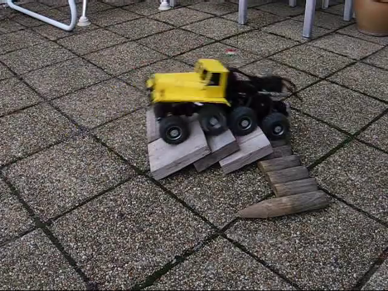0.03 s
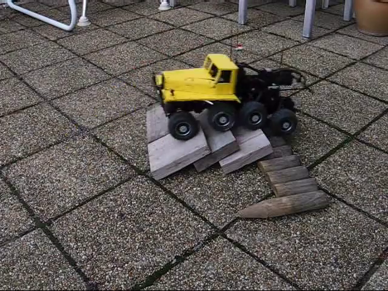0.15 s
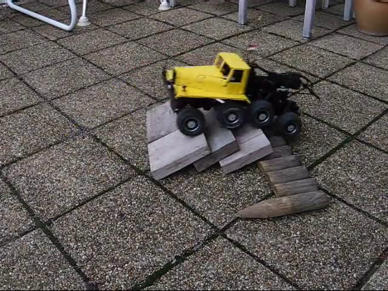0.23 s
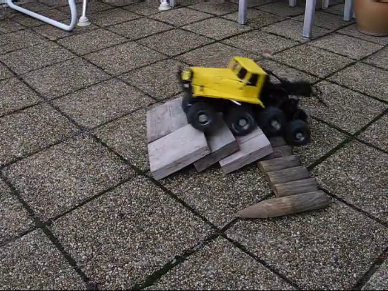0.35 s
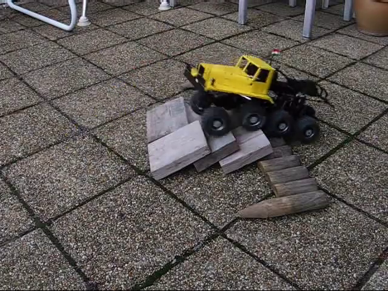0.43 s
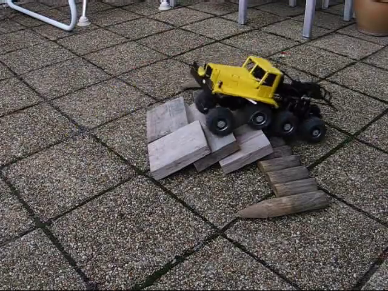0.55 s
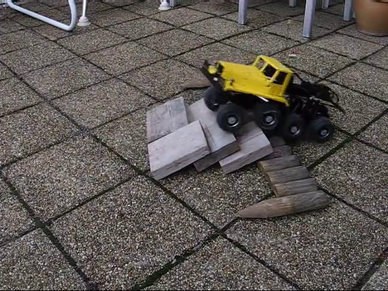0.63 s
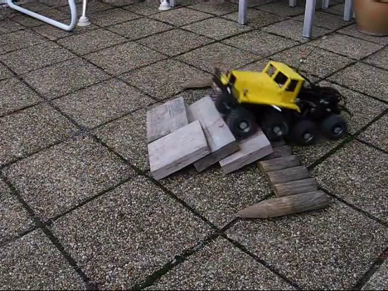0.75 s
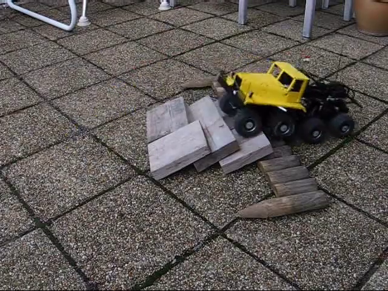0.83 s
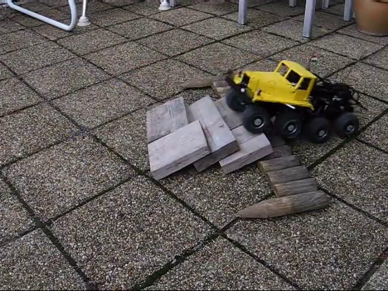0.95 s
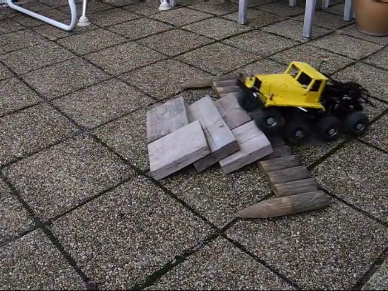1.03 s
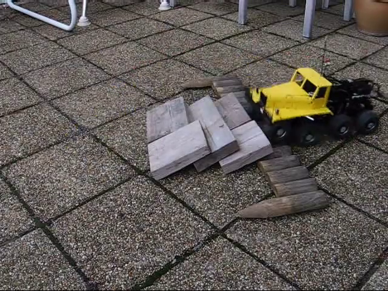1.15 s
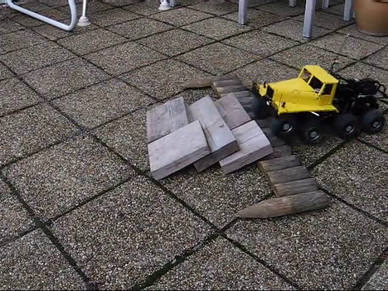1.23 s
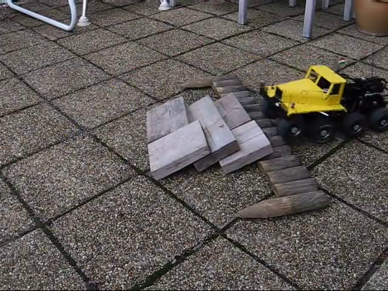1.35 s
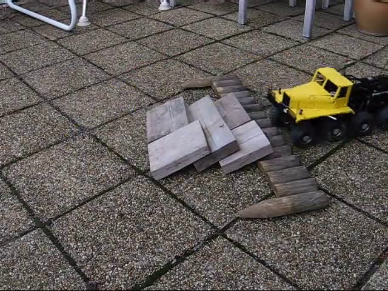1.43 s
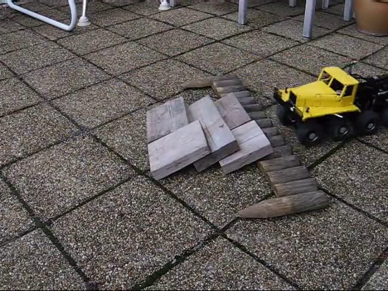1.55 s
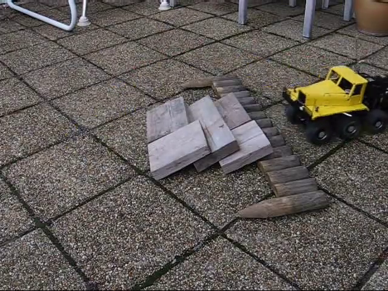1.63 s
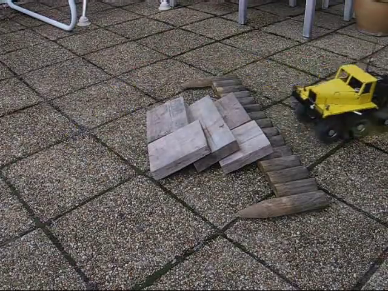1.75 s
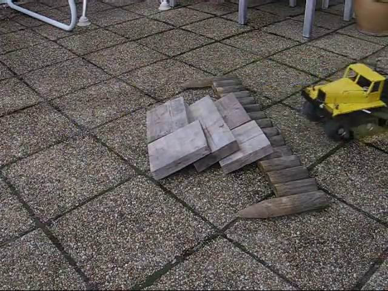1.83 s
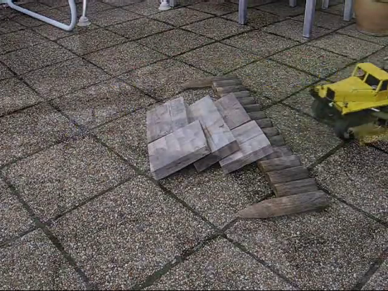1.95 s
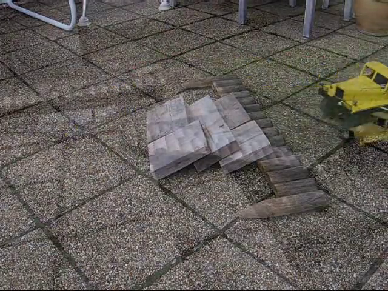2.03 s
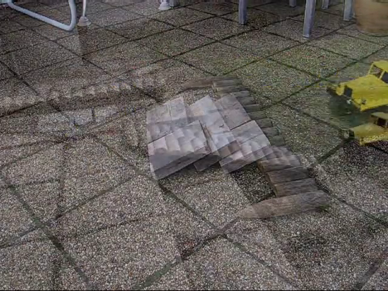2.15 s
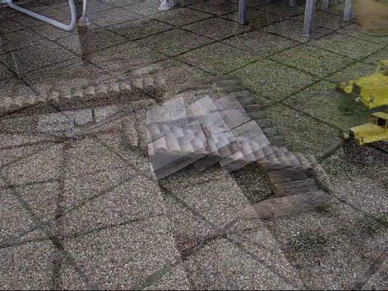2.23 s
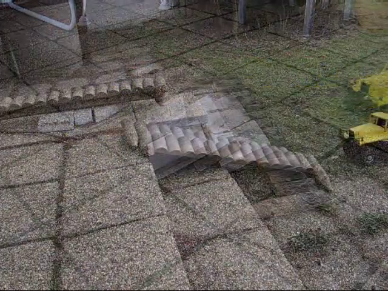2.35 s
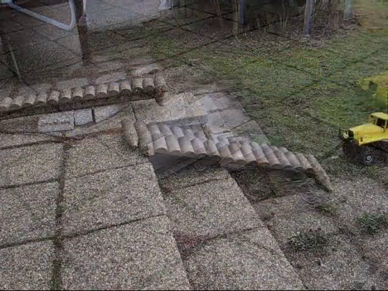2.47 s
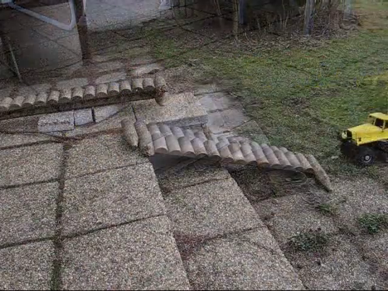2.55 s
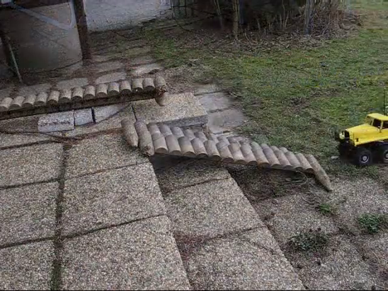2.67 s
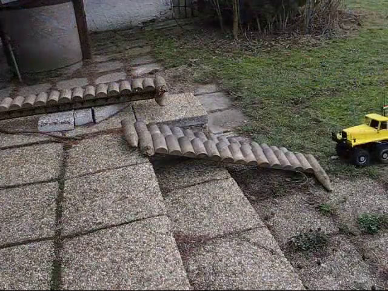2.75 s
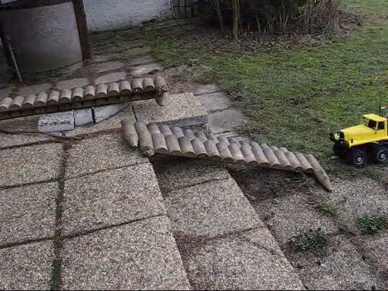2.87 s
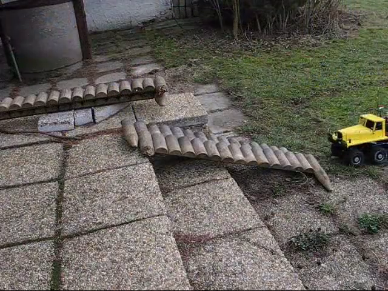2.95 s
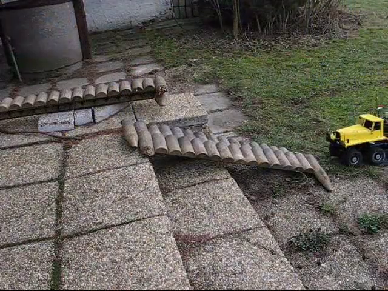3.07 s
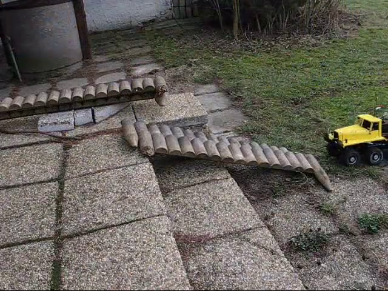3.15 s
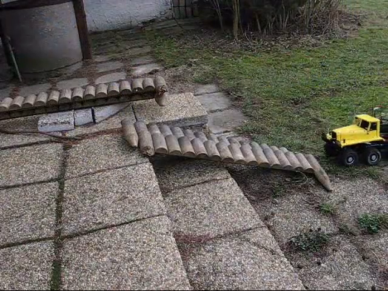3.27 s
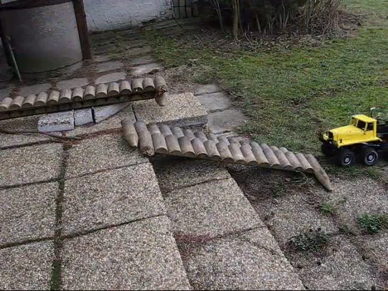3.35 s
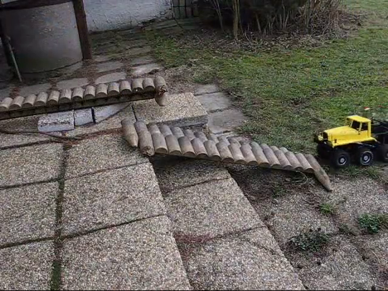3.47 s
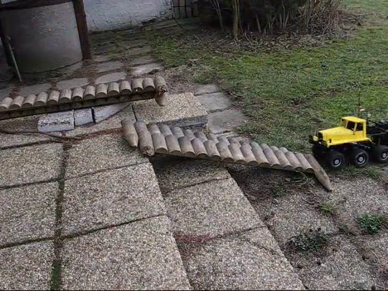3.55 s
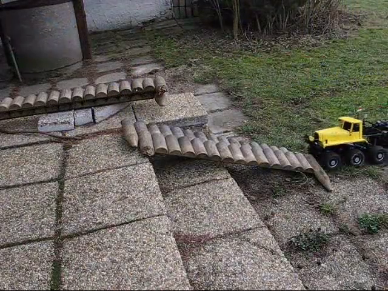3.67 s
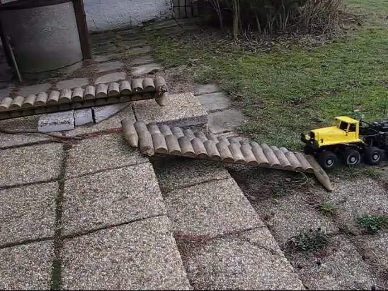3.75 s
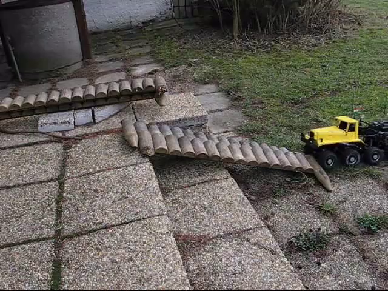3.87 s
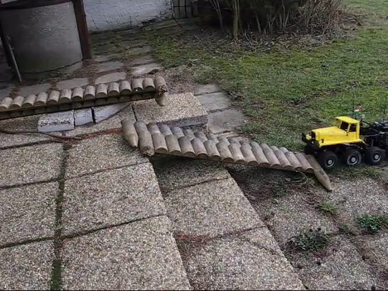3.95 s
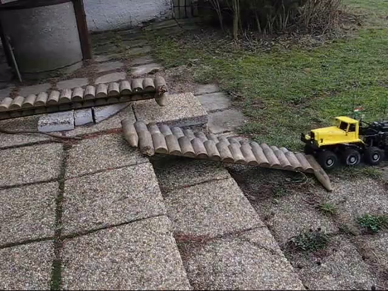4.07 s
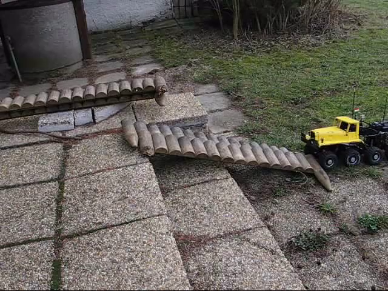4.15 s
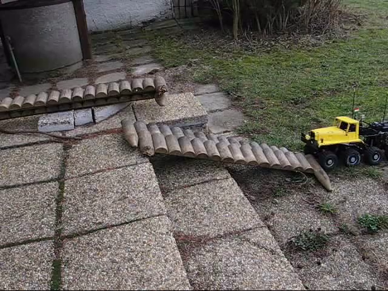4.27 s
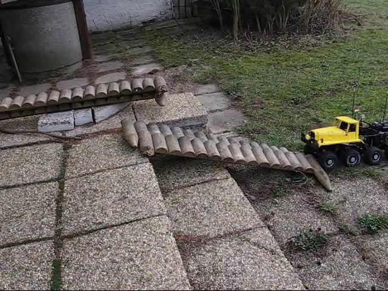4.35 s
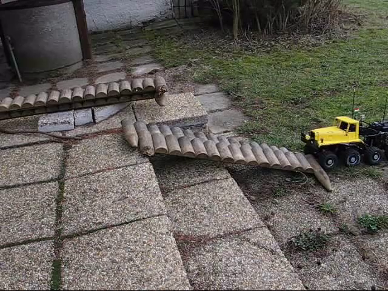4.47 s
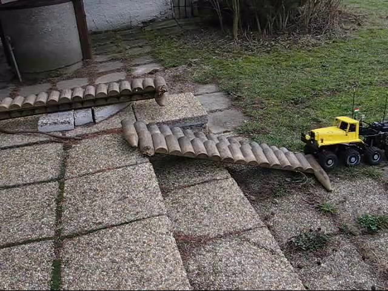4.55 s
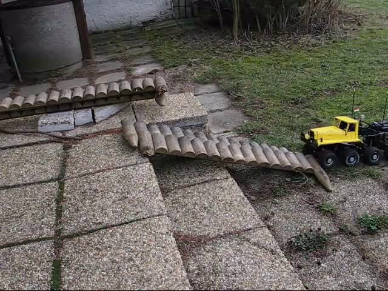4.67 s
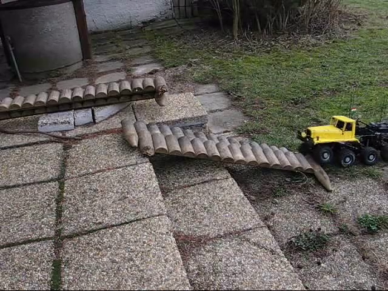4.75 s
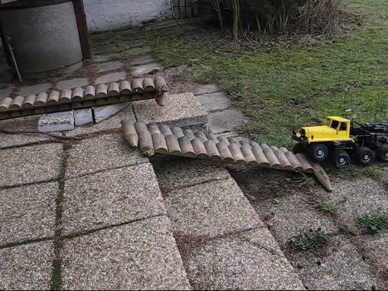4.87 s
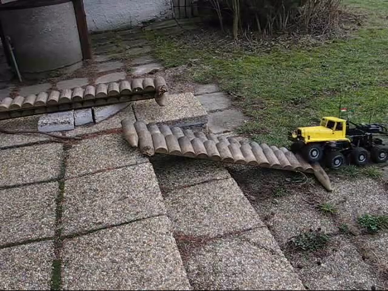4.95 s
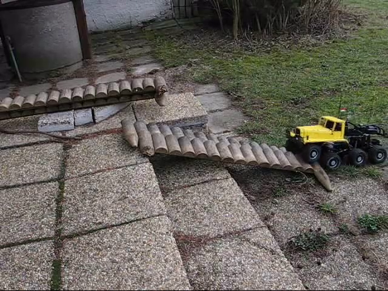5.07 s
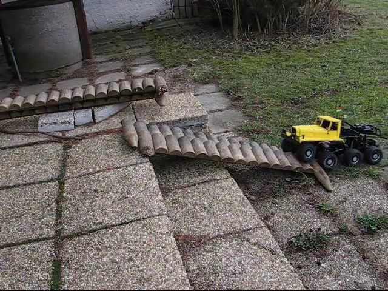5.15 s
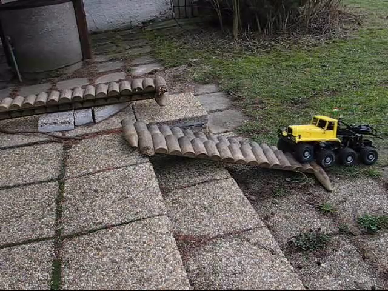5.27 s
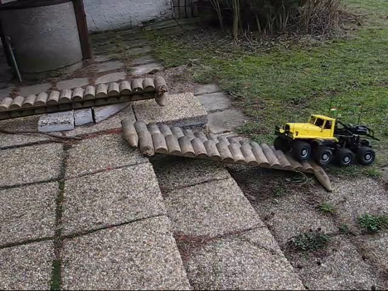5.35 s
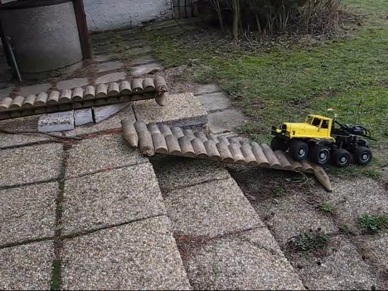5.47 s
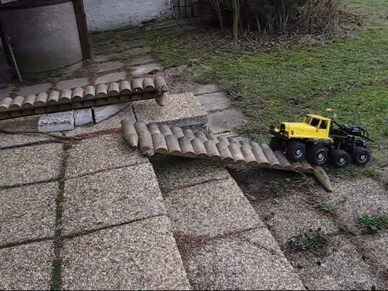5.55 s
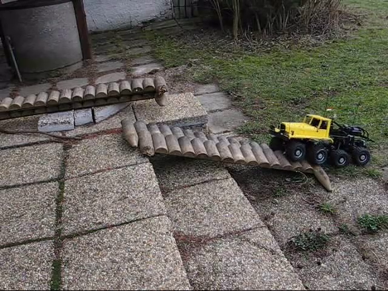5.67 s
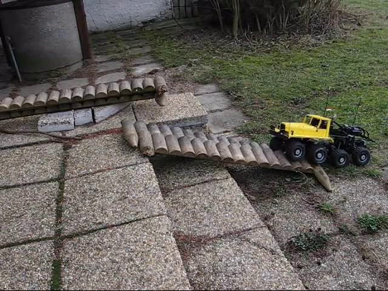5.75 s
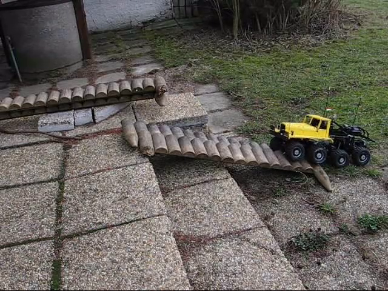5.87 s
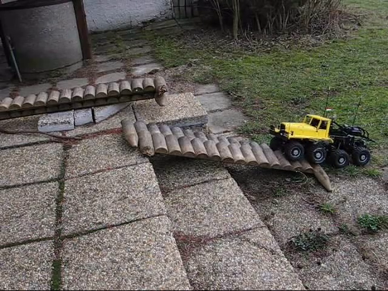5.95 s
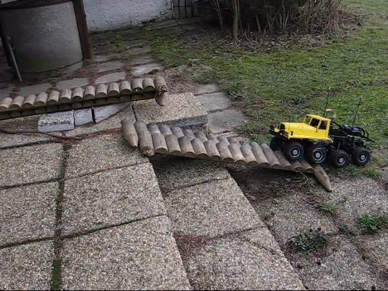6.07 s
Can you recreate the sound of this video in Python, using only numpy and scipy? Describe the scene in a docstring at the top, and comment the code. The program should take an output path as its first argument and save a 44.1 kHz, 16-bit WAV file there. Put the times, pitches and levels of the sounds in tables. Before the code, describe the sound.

Close, dense plastic gear rattle from a small motorized toy truck, with gliding high whines and hollow wheel knocks on wood. The drive softens, picks up, then stops for under a second, leaving faint hiss, short motor twitches and a hard clack. It restarts abruptly and weakens near the end. Low wind gusts bump the single microphone on a terrace; the sound is gritty, with crude metallic treble.

```python
"""Plastic gears rattle densely first: on a terrace, a toy truck with small electric motors crawls over wooden blocks.
It stops, twitches and starts again: random tooth contacts ring the shell, sines glide as gear whines,
struck resonances make the wheel knocks and drive clacks, and low noise in gusts is wind at the one microphone.
Wandering tones lie under the rattle, outdoor hiss and faint steady tones behind;
a pocket camera holds each slow sample, mirroring the sound into the treble."""
import sys
import numpy as np
from scipy import signal
from scipy.fft import rfft, irfft, next_fast_len
from scipy.io import wavfile

SR = 44100
rng = np.random.default_rng(int(sys.argv[2]) if len(sys.argv) > 2 else 0)


def master(y):
    """Save y as 16-bit WAV."""
    cut = np.clip(np.atleast_2d(y).T, -1, 1)
    pcm = np.round(cut * 32767)  # scale
    wavfile.write(sys.argv[1], SR, pcm.astype(np.int16))


N = 269451  # length [samples]
HOLD = 4  # samples for which the camera holds each value


def amp(db):
    """Turn dB into gain."""
    return 10 ** (np.asarray(db) / 20)


def rms_one(x):
    """Scale to rms 1."""
    return x / np.sqrt(np.mean(x ** 2) + 1e-20)


def in_time(rows):
    """Interpolate the columns of a curve table at every sample."""
    times, *columns = np.transpose(rows)
    return [np.interp(np.arange(N) / SR, times, column) for column in columns]


def drift(corner_hz):
    """Slow random wander of spread 1: noise at every 20th sample through two equal one-pole low-passes."""
    pole = np.exp(-2 * np.pi * corner_hz * 20 / SR)
    noise = rng.standard_normal(N // 20 + 4002)
    slow = signal.lfilter([1], [1, -2 * pole, pole ** 2], noise)[4000:]  # skip the settling
    return np.interp(np.arange(N) / 20, np.arange(len(slow)), rms_one(slow))


def band(x, low_hz, high_hz, order=2):
    """Butterworth band-pass."""
    return signal.sosfilt(signal.butter(order, [low_hz, high_hz], "band", fs=SR, output="sos"), x)


def coloured(x, spectrum):
    """Filter x by a spectrum table, up to half the camera's slow sample rate; rms 1."""
    size = next_fast_len(N)
    hz = np.arange(size // 2 + 1) * SR / size + 1e-3
    point_hz, point_db = np.transpose(spectrum)
    gain = amp(np.interp(np.log(hz), np.log(point_hz), point_db, left=-120))
    gain = gain * (hz < SR / HOLD / 2)
    return rms_one(irfft(rfft(x, size) * gain, size)[:N])


def regions(x, centres_hz):
    """Split x into overlapping frequency regions that add up to x again."""
    size = next_fast_len(N)
    hz, spectrum = np.arange(size // 2 + 1) * SR / size, rfft(x, size)
    shares = [np.interp(hz, centres_hz, one_region) for one_region in np.eye(len(centres_hz))]
    return [irfft(spectrum * share, size)[:N] for share in shares]


def ring(clicks, hz, t60):
    """A unit click starts a decaying sine of height 1; t60 [s] is its time to fall 60 dB."""
    r, w = amp(-60 / (t60 * SR)), 2 * np.pi * hz / SR
    # the tiny constant keeps the decayed filter from slowing down
    return signal.lfilter([0, np.sin(w)], [1, -2 * r * np.cos(w), r * r], clicks + 1e-18)


# The drive running, coasting to a stop and running again:
# (time [s], rattle level [dB], hum change below 2 kHz [dB], treble change above 4.4 kHz [dB])
DRIVE_CURVE = [(0, -20.5, 2, 2.5), (.9, -19.5, 1.5, -0.5), (1.1, -19.5, 1, -2), (1.74, -19.5, 0.5, -1.5),
               (2.1, -23, 1, -0.5), (2.55, -28, -1, -0.5), (2.77, -30.5, 0, -1), (3.02, -25.5, 0.5, 1),
               (3.38, -27.5, -0.5, 2.5), (3.44, -24.5, -0.5, 1.5), (3.85, -19.5, 1, 0.5),
               (3.96, -29, 2.5, 1), (4.04, -42.5, 8, -2), (4.07, -54, 13, 1), (4.78, -55, 5.5, -3.5),
               (4.795, -27, 0, 3), (4.85, -23.5, 3, 3), (5.05, -16.5, -2, -1.5), (5.2, -20, 1, 2),
               (5.6, -20.5, 2.5, 2.5), (5.645, -28, 1, 3.5), (5.77, -26, 0, 1.5), (5.79, -35, 3.5, 0),
               (6.11, -37.5, 2, -0.5)]
# Motor twitches while the truck stands: (start [s], length [s], peak rattle level [dB])
MOTOR_TWITCHES = [(4.10, .07, -50.5), (4.37, 0.16, -35), (4.695, .13, -38)]


def drive():
    """Rattle level, hum and treble changes [dB]: the twitches add their power to the running curve."""
    rise_s, fall_s = 0.025, 0.02
    peak_at, swell_range_db = 0.6, 9.5  # peak as a share of the length; growth before and loss after it
    rattle_db, hum_db, treble_db = in_time(DRIVE_CURVE)
    power, t = amp(2 * rattle_db), np.arange(N) / SR
    for start, length, peak_db in MOTOR_TWITCHES:
        edges = np.clip(np.minimum((t - start) / rise_s, (start + length - t) / fall_s), 0, 1)
        swell_db = swell_range_db * np.interp((t - start) / length, [0, peak_at, 1], [-1, 0, -1])
        power = power + (amp(peak_db + swell_db) * edges) ** 2
    return 10 * np.log10(power), hum_db, treble_db


# Colour of the gearbox in its plastic shell: (frequency [Hz], relative level [dB per Hz])
SHELL_COLOUR = [(88, -70), (150, -15.5), (278, -13), (314, -13), (354, -13.5), (424, -14), (464, -13),
                (1160, -17.5), (2130, -10.5), (2440, -4.5), (3500, 1), (4730, 0), (5500, 1.5), (7150, -34),
                (12100, -120)]


def gears():
    """Uneven tooth contacts, swelling once a shaft turn, ring the shell; each region of it wavers on its own."""
    teeth_per_s, tooth_spread_db = 5000, 2.3
    shaft_hz, shaft_depth = 159.5, 0.2
    hiss_db = -4  # smooth noise beside the contacts
    patchy_db, load_db = 0.9, 0.6  # wavering of each region and of the whole
    rattle_db, hum_db, treble_db = drive()

    turn = 2 * np.pi * np.cumsum(shaft_hz * (1 + 0.0409 * drift(1.625))) / SR
    sizes = amp(tooth_spread_db * np.minimum(rng.exponential(1, N), 5)) * rng.choice([-1, 1], N)
    contacts = rng.random(N) < teeth_per_s / SR
    teeth = sizes * contacts * (1 + shaft_depth * np.sin(turn))
    shell = coloured(rms_one(teeth) + amp(hiss_db) * rng.standard_normal(N), SHELL_COLOUR)

    centres_hz = [300, 800, 1300, 1800, 2300, 2800, 3300, 3800, 4300, 4800, 5300]
    out = np.zeros(N)
    for hz, part in zip(centres_hz, regions(shell, centres_hz)):
        tilt_db = hum_db if hz < 2000 else treble_db if hz > 4400 else 0
        out += part * amp(tilt_db + patchy_db * drift(7.0))
    return amp(rattle_db + load_db * drift(7.3)) * out


WOBBLE = 0.008  # spread of the fast pitch unsteadiness, as a share of the pitch
# Gear whines, one glide each:
# (start [s], length [s], first pitch [Hz], middle pitch [Hz], last pitch [Hz], rms level midway [dB])
WHINE_ARCS = [(.14, .11, 3450, 3680, 3620, -30), (.36, .12, 1720, 1700, 1750, -41),
              (.39, .09, 3650, 3700, 3750, -33), (.66, .07, 2350, 2000, 1580, -40),
              (.72, .12, 1580, 1600, 1600, -41), (1.07, .09, 1680, 1560, 1480, -41),
              (1.08, .08, 3620, 3530, 3700, -28), (1.36, .06, 2950, 2780, 2600, -29),
              (1.42, .16, 4500, 3620, 4200, -28), (1.575, .035, 4250, 4030, 3800, -29),
              (1.6, .09, 4500, 4720, 4500, -29), (1.68, .12, 4550, 4000, 3620, -29.5),
              (1.87, .25, 2480, 2510, 2430, -36), (2.1, .5, 2440, 2410, 2390, -43),
              (3.04, .21, 3420, 3450, 3430, -38), (3.22, .21, 1630, 1550, 1480, -49),
              (3.42, .22, 5350, 5390, 5330, -34), (3.43, .13, 3330, 3400, 3380, -33),
              (3.61, .09, 1400, 1445, 1520, -46), (3.75, .15, 3850, 3600, 3350, -31),
              (4.81, .12, 2350, 2560, 2580, -36), (4.82, .12, 3750, 3800, 3900, -30),
              (4.83, .07, 4600, 4620, 4750, -33), (4.84, .09, 1290, 1320, 1400, -49),
              (5.02, .27, 3580, 4070, 3650, -27), (5.24, .05, 5050, 5250, 5450, -30),
              (5.34, .16, 3550, 3710, 3480, -30), (5.49, .16, 3500, 3610, 3520, -30),
              (5.66, .12, 1880, 1980, 1930, -42)]


def whines():
    """Tooth-mesh tones: slightly unsteady sines on a parabolic glide, loudest midway, faded at the ends."""
    fade_s, ends_db, flutter_db = 0.0028, -1.5, 2.4  # ends relative to the middle, before the fade
    out, t = np.zeros(N), np.arange(N) / SR
    shake = 1 + WOBBLE * drift(70)
    flutter = amp(flutter_db * drift(35))
    for start, length, first, middle, last, level_db in WHINE_ARCS:
        on = (t > start) & (t < start + length)
        u = 2 * (t[on] - start) / length - 1  # -1 at the start, 1 at the end
        hz = middle + u * (last - first) / 2 + u ** 2 * ((first + last) / 2 - middle)
        phase = 2 * np.pi * np.cumsum(hz * shake[on]) / SR
        fade = np.clip((1 - np.abs(u)) * length / 2 / fade_s, 0, 1)
        out[on] += fade * amp(level_db + ends_db * u ** 2) * np.sin(phase)
    return np.sqrt(2) * flutter * out


# Mean pitches of faint wandering tones: (pitch [Hz])
WANDERING_PITCHES = [1700, 2650, 3250, 3600, 4400, 5350]


def wandering_tones():
    """Faint tones under the rattle, their pitch wandering and their level fluttering at random."""
    tone_db, flutter_db = -17, 4  # relative to the rattle, where the shell colour is strongest
    colour_hz, colour_db = np.transpose(SHELL_COLOUR)
    out = np.zeros(N)
    for hz in WANDERING_PITCHES:
        pitch = hz * (1 + 0.04 * drift(4) + WOBBLE * drift(70))
        level_db = np.interp(hz, colour_hz, colour_db - colour_db.max()) + flutter_db * drift(9)
        out += amp(level_db) * np.sin(2 * np.pi * np.cumsum(pitch) / SR)
    return amp(drive()[0] + tone_db) * out


# Wheels and chassis knocking on the wood: (time [s], main ring level [dB], pitch [Hz])
WOOD_KNOCKS = [(0.104, -24.5, 700), (0.179, -22, 360), (0.19, -26, 340), (0.201, -17, 290),
               (0.217, -21, 286), (0.231, -25, 554), (0.507, -25, 292), (0.516, -21.5, 420),
               (0.526, -17.5, 270), (0.54, -20, 292), (0.63, -22.5, 356), (0.892, -25, 378),
               (0.912, -22, 368), (0.934, -16, 480), (0.948, -19.5, 398), (1.123, -26.5, 770),
               (1.278, -28, 358), (1.296, -19.5, 236), (1.302, -19, 406), (1.324, -25, 640),
               (1.6, -22, 376)]


def knocks():
    """A soft tyre blow rings the block at its pitch and at a weaker, longer overtone."""
    t60 = 0.039  # [s]
    out = np.zeros(N)
    for time, level_db, hz in WOOD_KNOCKS:
        click = np.zeros(N)
        click[round(time * SR)] = amp(level_db)
        out += ring(click, hz, t60) + 0.32 * ring(click, 1.95 * hz, 2 * t60)
    return out


# Hard clacks of the drive taking up its slack: (time [s], strike level [dB], boost of modes above 1300 Hz [dB])
SLACK_CLACKS = [(2.4485, -32, 7), (3.993, -27, 1), (4.4625, -16, 0)]
# Contacts within one clack: (delay [s], relative level [dB])
CONTACTS = [(0, -1.5), (.0019, 4.5), (.0056, -1)]
# Ringing modes of the plastic: (frequency [Hz], relative level [dB], decay by 60 dB [s])
PLASTIC_MODES = [(594, -5.5, 0.034), (815, 2, 0.015), (1100, -1.5, 0.0051), (1410, -3, 0.0055),
                 (1740, -0.5, 0.0095), (1870, -1, 0.013), (2600, -18, 0.0092), (4650, -10.5, 0.0091)]


def clacks():
    """A few contacts within milliseconds ring the same plastic modes; the small part radiates no bass."""
    out = np.zeros(N)
    for time, strike_db, upper_db in SLACK_CLACKS:
        click = np.zeros(N)
        for delay, blow_db in CONTACTS:
            click[round((time + delay) * SR)] = amp(strike_db + blow_db)
        for k, (hz, level_db, t60) in enumerate(PLASTIC_MODES):
            sign = (-1) ** k  # neighbouring modes start in opposite directions
            out += sign * amp(level_db + upper_db * (hz > 1300)) * ring(click, hz, t60)
    return signal.sosfilt(signal.butter(4, 480, "high", fs=SR, output="sos"), out)


# Gusts on the microphone:
# (middle [s], length [s], peak deep level [dB], upper part relative to the deep part [dB])
WIND_GUSTS = [(0.258, 0.27, -30, -11), (1.196, .3, -40, -10), (1.73, .1, -32, -14),
              (1.934, 0.11, -29.5, -12.5), (2.232, 0.38, -25.5, -13.5), (2.45, 0.27, -26.5, -22),
              (2.596, 0.11, -25, -20), (2.87, .1, -28, -22), (3.08, 0.24, -40, -22), (3.2, 2, -37.5, -19),
              (3.334, .16, -22.5, -8), (3.479, 0.22, -18, -3.5), (3.695, 0.29, -22.5, -14),
              (3.89, .08, -23.5, -22), (4.072, 0.16, -21, -19), (4.285, 0.32, -35, -27),
              (4.57, .1, -42, -17), (5.688, 0.058, -28.5, -18), (5.829, .22, -21, -7),
              (5.928, 0.15, -27, -11), (6.051, 0.13, -16, -25)]


def wind():
    """Eddies at the microphone port: lumpy deep and upper noise; each gust swells and dies as half a sine."""
    calm_deep_db, calm_upper_db, lumpy_db = -45.5, -49, 2.5
    t = np.arange(N) / SR
    deep_power, upper_power = amp(2 * calm_deep_db), amp(2 * calm_upper_db)
    for middle, length, deep_db, upper_db in WIND_GUSTS:
        half_sine = np.cos(np.pi * np.clip((t - middle) / length, -0.5, 0.5))
        swell = (amp(deep_db) * half_sine) ** 2
        deep_power = deep_power + swell
        upper_power = upper_power + swell * amp(2 * upper_db)
    deep = band(rng.standard_normal(N), 10, 72, order=3)
    upper = band(rng.standard_normal(N), 70, 157, order=3)
    deep = rms_one(amp(lumpy_db * drift(19)) * deep)
    upper = rms_one(amp(lumpy_db * drift(13)) * upper)
    return np.sqrt(deep_power) * deep + np.sqrt(upper_power) * upper


# Faint tones, probably the camera's own: (frequency [Hz], level [dB])
FAINT_TONES = [(1604, -64), (1825, -56), (3612, -68)]
# The tones fade in: (from [s], to [s])
TONES_FADE_IN = (2.0, 2.8)


def camera_tones():
    """Sines of fixed pitch whose levels waver slightly."""
    t, tones = np.arange(N) / SR, np.zeros(N)
    for hz, level_db in FAINT_TONES:
        tones += np.sqrt(2) * amp(level_db + 2.0 * drift(12)) * np.sin(2 * np.pi * hz * t)
    return np.interp(t, TONES_FADE_IN, [0, 1]) * tones


# Colour of the outdoor air and hiss: (frequency [Hz], relative level [dB per Hz])
AIR_COLOUR = [(100, -33), (150, -2.5), (400, -4.5), (800, -5), (1300, -10.5), (2500, -9.5), (5500, -28)]


def outdoor_floor():
    """Steady coloured noise: the quiet air of the terrace, with hiss."""
    return amp(-51) * coloured(rng.standard_normal(N), AIR_COLOUR)


def scene():
    """Truck, wandering tones, wind and background at one microphone."""
    truck = gears() + whines() + knocks() + clacks()
    background = camera_tones() + outdoor_floor()
    return (truck + wandering_tones() + wind() + background)[None]


def record(dry):
    """Peaks are rounded; every fourth value is held, which mirrors the spectrum upward; the top is cut."""
    overload, offset, cutoff_hz = 0.62, -0.0125, 15420  # ceiling of the rounding; constant shift
    rounded = overload * np.tanh(dry / overload) + offset
    held = np.repeat(rounded[:, ::HOLD], HOLD, axis=1)[:, :N]
    return signal.sosfilt(signal.ellip(14, 0.3, 85, cutoff_hz, fs=SR, output="sos"), held)


dry = scene()
out = record(dry)
master(out)
```